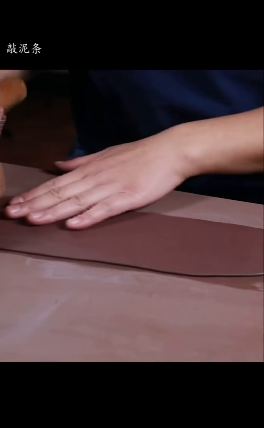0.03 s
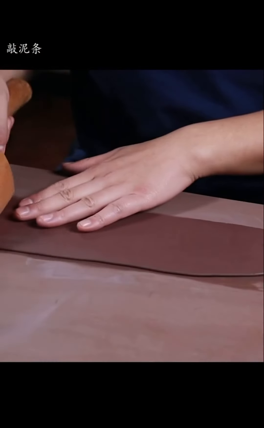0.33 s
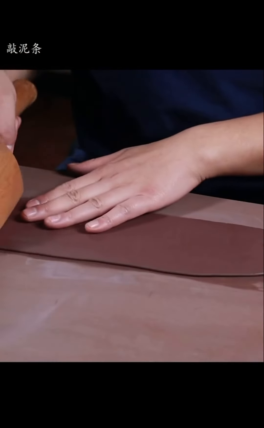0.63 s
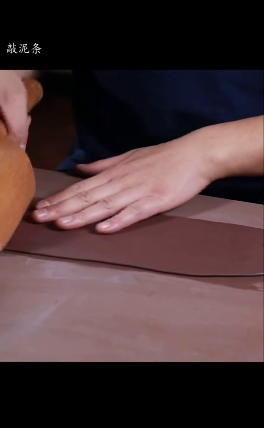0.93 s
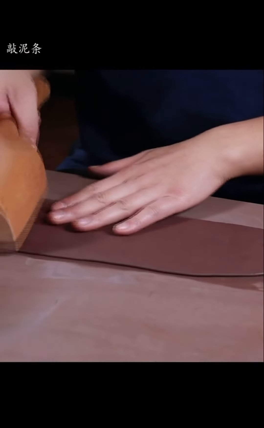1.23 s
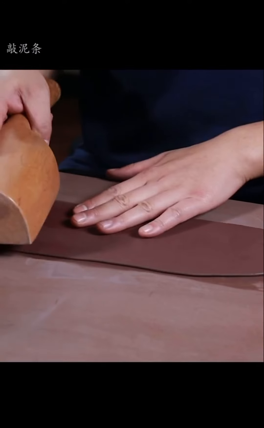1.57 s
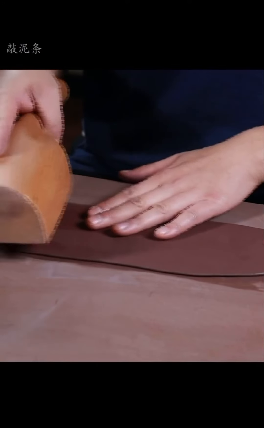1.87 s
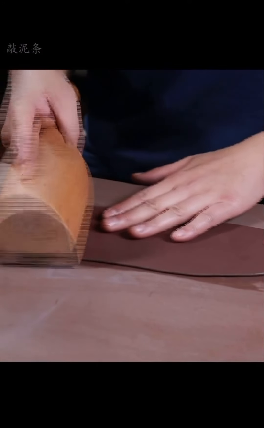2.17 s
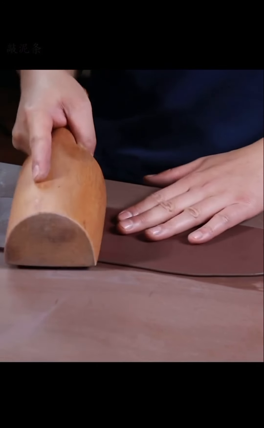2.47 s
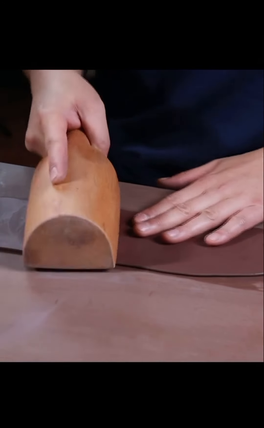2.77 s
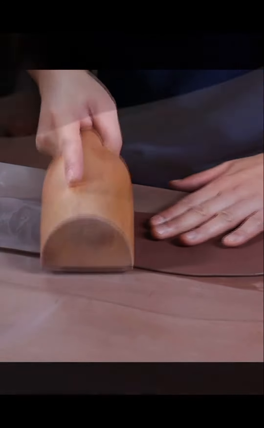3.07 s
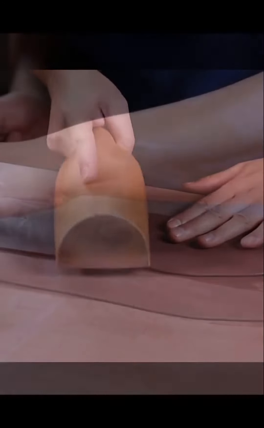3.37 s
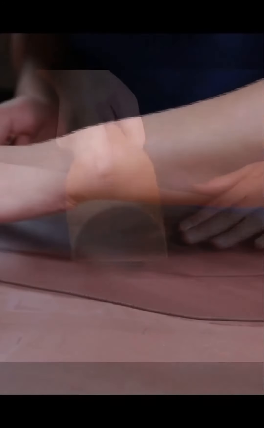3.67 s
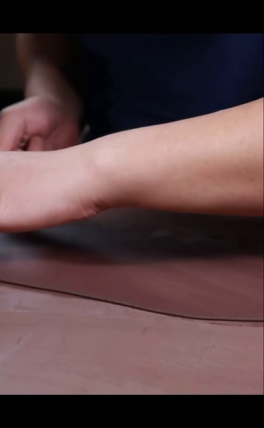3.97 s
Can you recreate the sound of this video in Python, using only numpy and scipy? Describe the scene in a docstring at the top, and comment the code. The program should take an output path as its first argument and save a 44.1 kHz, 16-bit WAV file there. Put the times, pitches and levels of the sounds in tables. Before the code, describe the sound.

Close, steady thuds of a wooden mallet flattening a clay strip, each with a knock and a damp slap. The table resonates and the small room reverberates, then the beating stops abruptly, leaving quiet room tone.

```python
"""Dull thuds, each with a woody knock and a wet smack, come nearly four a second: a wooden mallet is
beating a strip of clay flat on a work table, moving along the strip. The clay damps the thud within a few
cycles, the mallet's head rings in its modes, and air squeezed from under the face makes the smack.
The table rings on and the small workshop reverberates. Just after the last blow the sound is cut off,
leaving quiet room tone."""
import sys
import numpy as np
from scipy import signal
from scipy.fft import rfft, irfft
from scipy.io import wavfile

SR = 44100
rng = np.random.default_rng(int(sys.argv[2]) if len(sys.argv) > 2 else 0)


def to_wav(sig):
    """Store sig (one row per channel, or 1-D mono) as 16-bit WAV at the path in sys.argv[1].

    Samples outside -1..1 are clipped; the rate is SR.
    """
    pcm = np.clip(np.atleast_2d(sig), -1, 1) * 32767
    pcm = np.round(pcm).astype(np.int16)
    wavfile.write(sys.argv[1], SR, pcm.T)  # frames by channels


N = 176400
LEAD = SR // 2  # samples ahead of time zero, so that an earlier blow is still ringing
CLICK_HEIGHT = np.sqrt(SR / 1000)  # one sample with the energy of a millisecond at full level


def from_db(db):
    """Amplitude ratio of a level in decibels."""
    return 10 ** (np.asarray(db) / 20)


def at_hz(rows, hz, column=1):
    """Interpolation of a table column on a logarithmic frequency axis."""
    rows = np.array(rows)
    return np.interp(np.log(hz), np.log(rows[:, 0]), rows[:, column])


def band(x, low, high):
    """Band-pass filtering between two edges in hertz."""
    sos = signal.butter(2, [low, min(high, SR * .45)], "band", fs=SR, output="sos")
    return signal.sosfilt(sos, x + 1e-18)


def unit(x):
    """Normalisation to unit energy."""
    return x / np.sqrt(np.sum(x ** 2) + 1e-20)


def ring(t, hz, t60):
    """Damped free vibration: a sine that loses 60 dB in t60 seconds."""
    return np.sin(2 * np.pi * hz * t) * from_db(-60 * t / t60)


def add(track, s, sound):
    """Superposition of a sound at time s on a track that begins LEAD samples early."""
    i = max(int(s * SR) + LEAD, 0)
    track[i:i + len(sound)] += sound[:len(track) - i]


def room_tone(rms_db=-68):
    """Stationary noise whose spectrum falls toward the treble: a steady, dull background."""
    # background spectrum: (frequency [Hz], relative spectral density [dB])
    spectrum = [(25, -3), (42, -16), (62, 0), (97, -11), (220, -4.5), (373, -6.5), (503, -6), (962, -12.5),
                (1290, -11), (2610, -24.5), (7000, -27), (11500, -33), (16000, -44)]
    hz = np.maximum(np.arange(N // 2 + 1) * SR / N, 1)
    noise = irfft(rfft(rng.standard_normal(N)) * from_db(at_hz(spectrum, hz)), N)
    return from_db(rms_db) * np.sqrt(N) * unit(noise)


def late_drop(t, at_s=0.114, width_s=0.002, step_db=1):
    """Decay envelope: the ringing steps down slightly once the early echoes are over."""
    return from_db(-step_db * .5 * (1.5 + np.tanh((t - at_s) / width_s)))


def workshop(x, t, rise_s=0.002):
    """Reverberation: a few near reflections, then a diffuse tail that dies sooner in the treble."""
    # diffuse field: (frequency [Hz], level against the direct sound [dB], t60 [s])
    reverberation = [(61.4, -4, 0.52), (127.7, 5, 0.98), (270, 0, 1), (400, -7.5, 0.78), (582, 5.5, 0.45),
                     (800, -2.5, 1), (1080, -3, 0.73), (1800, -5.5, 0.92), (3020, -1.5, 0.86),
                     (6500, -2.5, 0.58), (13500, -8.5, 0.27)]
    # reflections, coloured by their surfaces: (delay [s], level [dB], low edge [Hz], high edge [Hz])
    echoes = [(.0045, -9.5, 700, 1170), (.0086, -11.5, 600, 10900), (0.0141, -5.5, 204, 693),
              (0.0132, -15, 1510, 10100)]
    response = np.zeros(len(t))
    envelope = (1 - np.exp(-t / rise_s)) * late_drop(t)
    edges = np.geomspace(45, 17000, 27)
    for low, high in zip(edges, edges[1:]):
        hz = np.sqrt(low * high)
        decay = from_db(-60 * t / at_hz(reverberation, hz, column=2))
        tail = band(rng.standard_normal(len(t)), low, high) * envelope * decay
        response += unit(tail) * np.sqrt(2 * (high - low) / SR) * from_db(at_hz(reverberation, hz))
    for delay, db, low, high in echoes:
        response += from_db(db) * band(signal.unit_impulse(len(t), int(delay * SR)), low, high)
    return signal.fftconvolve(x, response)[:len(x)]


def standing_waves(t, place, strongest_place=0.68, fall_db_per_strip=11):
    """Standing waves build up between the walls and ebb again, each heard as a brief rising tone."""
    # swells: (frequency at peak [Hz], glide [Hz/s], delay [s], width [s], level against the thud [dB])
    swells = [(254.4, 450, 0.02845, .016, -17.5), (479, 3100, .022, 0.02, -17.5),
              (527.6, 3700, .053, 0.0092, -14)]
    waves = np.zeros(len(t))
    for hz, glide, delay, width, db in swells:
        age = t - delay
        phase = 2 * np.pi * (hz + .5 * glide * age) * age
        waves += from_db(db) * np.sin(phase) * np.exp(-(age / width) ** 2)
    return waves * from_db(-fall_db_per_strip * abs(place - strongest_place))


def air_puffs(track, t):
    """Air displacement: the flattest blows push a slow pressure swing onto the listener."""
    # puffs of air: (time [s], level [dB])
    puffs = [(.585, -45), (1.143, -45), (2.188, -55)]
    for s, db in puffs:
        add(track, s, from_db(db) * ring(t, hz=26, t60=0.11))


def work_table(t, place, rise_s=0.0077, scatter_db=3):
    """Modal vibration: the place struck sets each table mode's strength, with some random scatter."""
    # table modes, levels against the thud when struck at three places along the strip:
    # (frequency [Hz], t60 [s], level at start [dB], level at middle [dB], level at end [dB])
    modes = [(110.4, 0.8, -34, -38, -39), (165.4, 0.62, -30, -32.5, -24.5), (232.2, 0.23, -27, -13, -18),
             (251.4, 0.74, -23, -23, -18), (278.7, 0.49, -25.5, -18.5, -21), (352, 0.73, -26, -24, -38),
             (440.7, 0.14, -19, -16.5, -26), (495, 0.62, -35, -25, -20.5), (529.2, 0.79, -27, -23, -24),
             (696, 0.73, -30, -31.5, -27.5), (705, 0.17, -37, -7, -40.5), (915, 0.78, -28.5, -45.5, -35),
             (912, 0.64, -30, -32.5, -24), (1462, 0.98, -72, -56, -39)]
    scatter = from_db(scatter_db * rng.standard_normal(len(modes)))
    ringing = np.zeros(len(t))
    for k, (hz, t60, *dbs) in enumerate(modes):
        gain = scatter[k] * from_db(np.interp(place, [0, .5, 1], dbs))
        ringing += (-1) ** k * gain * ring(t, hz, t60)
    return ringing * (1 - np.exp(-t / rise_s)) * late_drop(t)


def radiation(x, corner_hz=152):
    """Radiation efficiency: small surfaces give off little deep bass."""
    return signal.sosfilt(signal.butter(2, corner_hz, "high", fs=SR, output="sos"), x + 1e-18)


def pocket(hz, cycles=10.3):
    """Cavity resonance: a small hollow pops and loses 60 dB over the given cycles."""
    pop = np.diff(ring(np.arange(SR // 20) / SR, hz, cycles / hz), prepend=0)
    return unit(band(pop, hz / 2, hz * 2)) * CLICK_HEIGHT


def light_taps(track):
    """Impulse excitation: light taps between the first blows ring briefly at one pitch each."""
    # taps: (time [s], level [dB], frequency [Hz], ringing [cycles])
    taps = [(0.1988, -37.5, 1570, 8.4), (.4340, -53, 3750, 37)]
    for s, db, hz, cycles in taps:
        add(track, s, from_db(db) * pocket(hz, cycles))


def smack(tilt_db, top_hz, low_hz=2580, pivot_hz=4670, snap_db=2, splutter_db=0.5, splutter_s=0.0036):
    """Broadband transient: the flat face meets wet clay with a snap, and squeezed air splutters out."""
    n = SR // 20
    snap = from_db(snap_db) * signal.unit_impulse(n)
    decay = np.exp(-np.arange(n) / SR / splutter_s)
    splutter = from_db(splutter_db) * unit(rng.standard_normal(n) * decay)
    hz = np.maximum(np.arange(n // 2 + 1) * SR / n, 100)
    tilt = from_db(tilt_db * np.log2(hz / pivot_hz))
    roll_off = np.sqrt((1 + (low_hz / hz) ** 4) * (1 + (hz / top_hz) ** 8))
    cepstrum = irfft(np.log(tilt / roll_off), n)[:n // 2]
    cepstrum[1:] *= 2  # minimum phase: nothing sounds ahead of the contact
    colour = np.exp(rfft(cepstrum, n))
    return [CLICK_HEIGHT * irfft(rfft(x) * colour, n) for x in (snap, splutter)]


def mallet(t, place):
    """Modal vibration of the wooden head: a knock, harder and brighter toward the strip's end."""
    # modes of the wood: (frequency [Hz], t60 [s], level at strip start [dB], level at strip end [dB])
    modes = [(700, 0.026, -17.5, -9), (888, 0.044, -6, -11), (922, 0.022, -8.5, -7),
             (1007.6, 0.038, -10, -15), (1146, 0.036, -20.5, -12.5), (1456, 0.015, -20, -8),
             (1763, 0.0098, -18, -6.5)]
    return sum((-1) ** k * from_db(np.interp(place, [0, 1], dbs)) * ring(t, hz, t60)
               for k, (hz, t60, *dbs) in enumerate(modes))


def thud(t, push_db=-21, push_s=0.00013):
    """Heavily damped impact: a short push, and a swing that the clay absorbs within a few cycles."""
    push = from_db(push_db) * t / push_s * np.exp(1 - t / push_s)
    return push + ring(t, hz=396, t60=0.016)


def scene(stretch_count=4, smack_lag_s=0.000814, jet_db=-3.5, cut_s=3.340, fade_s=0.0073):
    """Superposition of blows and reverberation, cut off after the last blow, over steady room tone."""
    # mallet blows: (time [s], place along the strip [0-1], thud level [dB], knock level [dB],
    # smack level [dB], smack tilt [dB/octave], smack top [Hz], air pocket [Hz], pocket level [dB])
    blows = [(-.232, 0, -18, -37, -34.5, -12.5, 7840, 1220, -55),
             (.0420, 0.03, -16.5, -21, -38, -3, 7640, 1030, -30),
             (0.3144, 0.37, -21.5, -24, -47, -13, 6940, 900, -82),
             (0.5916, 0.52, -22, -17, -41, -10, 8000, 1204, -30.5),
             (0.8756, 0.18, -19.5, -22.5, -48, 4, 8400, 2970, -37),
             (1.1515, 0.24, -17.5, -19.5, -36, -0.5, 7800, 3700, -40),
             (1.4187, 0.43, -20, -25.5, -38, 3, 7900, 5100, -46.5),
             (1.6595, 0.64, -19.5, -22.5, -35, -1, 9500, 3800, -45.5),
             (1.9328, 0.61, -19.5, -24.5, -42, 1.5, 8800, 7700, -51.5),
             (2.1921, .55, -17.5, -19.5, -35, -1.5, 8500, 1604, -38),
             (2.4506, 0.58, -18.5, -22, -36.5, 3, 7500, 7100, -54),
             (2.7274, 0.94, -20.5, -17.5, -36.5, -1, 10100, 1625, -35.5),
             (2.9885, 0.99, -22, -19.5, -29.5, 1.5, 6500, 4810, -44),
             (3.2576, 0.58, -23, -19, -30.5, 3, 6440, 3310, -38)]
    t = np.arange(SR) / SR
    stretches = np.zeros((stretch_count, LEAD + N))  # each stretch of the strip has its own diffuse tail
    near = np.zeros(LEAD + N)  # heard without added reverberation
    for s, place, thud_db, knock_db, smack_db, tilt_db, top_hz, pocket_hz, pocket_db in blows:
        stretch = stretches[min(int(place * stretch_count), stretch_count - 1)]
        snap, splutter = smack(tilt_db, top_hz)
        pop = from_db(pocket_db) * pocket(pocket_hz)
        jet = from_db(jet_db) * pop  # air escapes toward the listener: extra direct sound
        add(stretch, s, from_db(thud_db) * thud(t) + from_db(knock_db) * mallet(t, place))
        add(stretch, s + smack_lag_s, from_db(smack_db) * snap + pop)
        add(near, s + smack_lag_s, from_db(smack_db) * splutter + jet)
        add(near, s, from_db(thud_db) * (work_table(t, place) + standing_waves(t, place)))
    light_taps(stretches[0])
    air_puffs(near, t)
    work = near + sum(x + workshop(x, t) for x in radiation(stretches))
    cut = np.clip((cut_s - np.arange(N) / SR) / fade_s, 0, 1)
    return (work[LEAD:] * cut + room_tone())[None]


def record(dry, ceiling=.105, cutoff_hz=15800):
    """Saturation flattens the first swings of the hardest blows; a low-pass removes the top treble."""
    limited = dry / (1 + (dry / ceiling) ** 8) ** (1 / 8)
    return signal.sosfilt(signal.ellip(10, .2, 70, cutoff_hz, fs=SR, output="sos"), limited)


dry = scene()
out = record(dry)
to_wav(out)
```